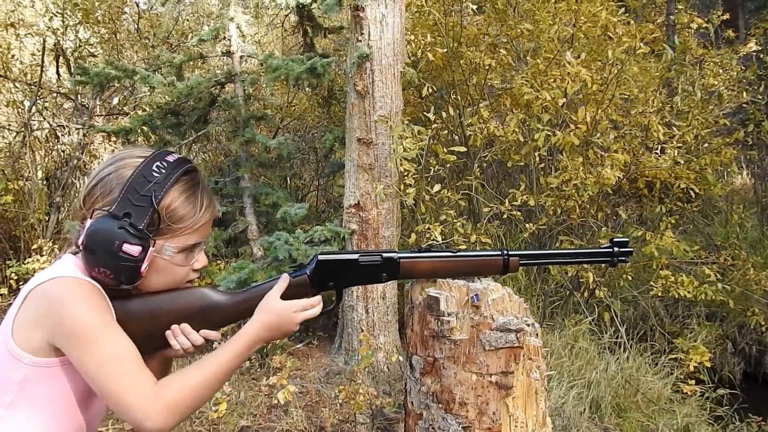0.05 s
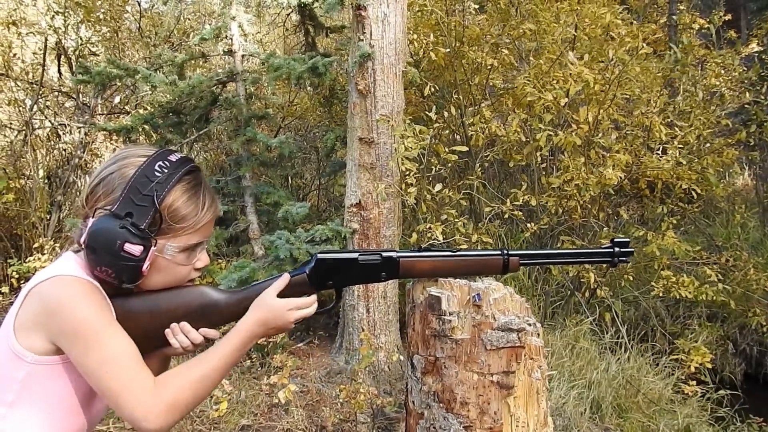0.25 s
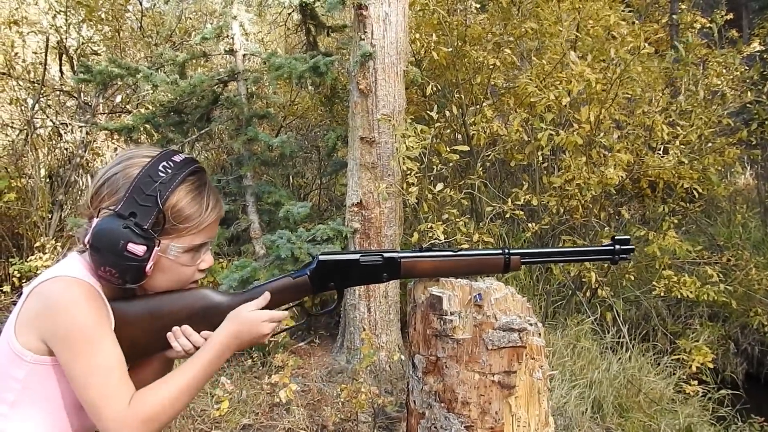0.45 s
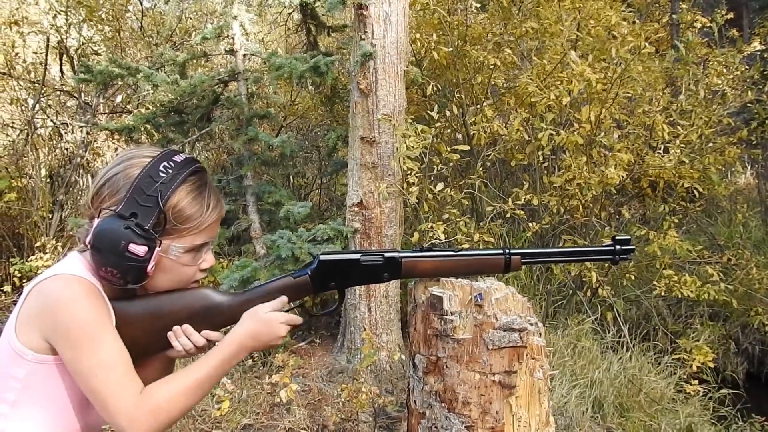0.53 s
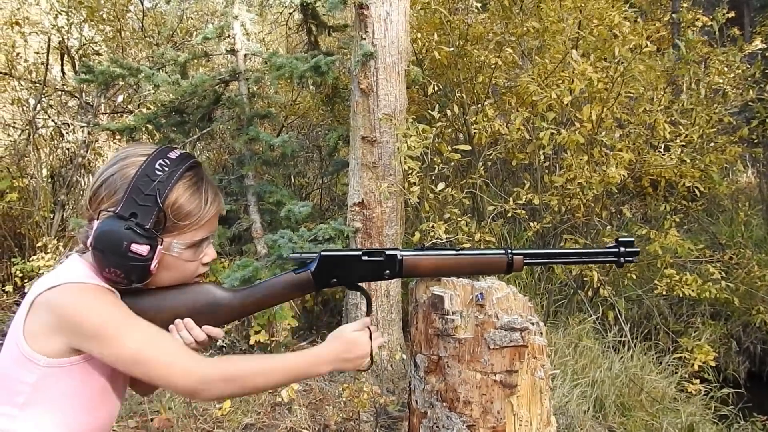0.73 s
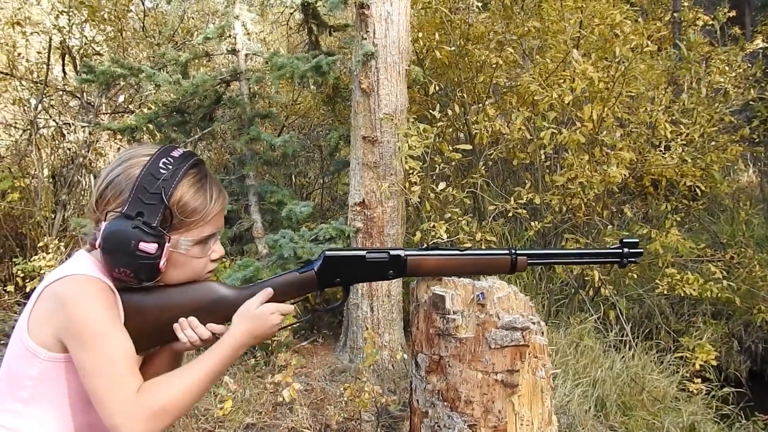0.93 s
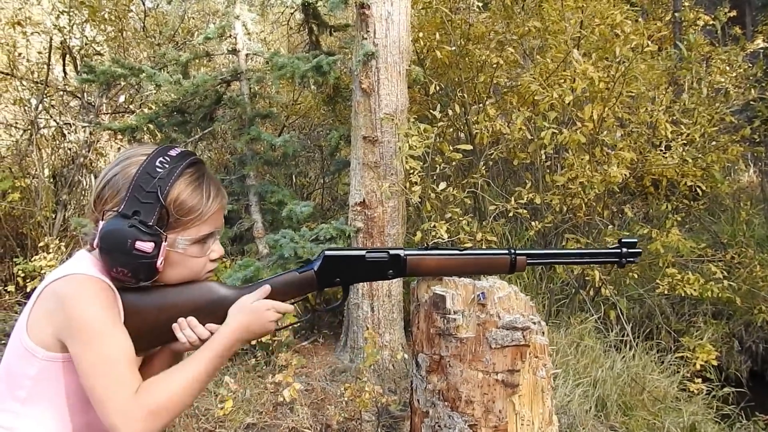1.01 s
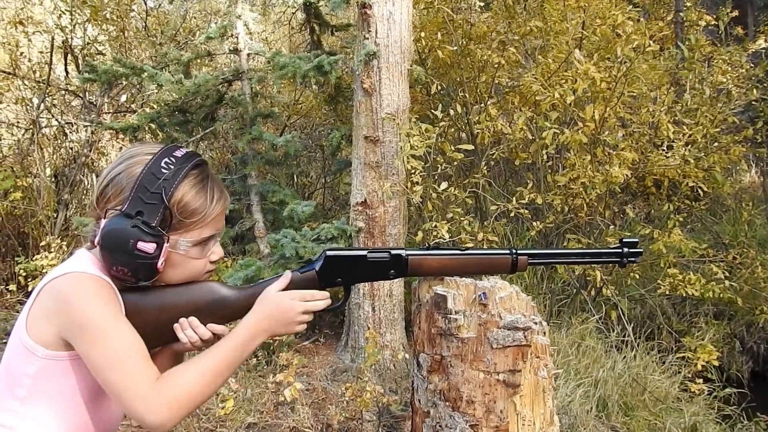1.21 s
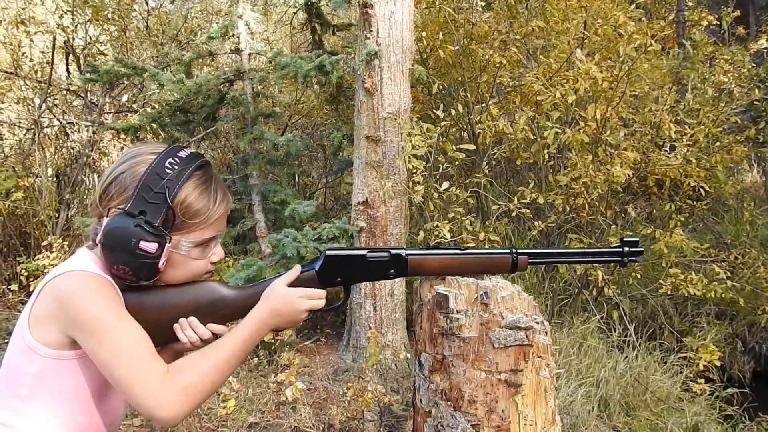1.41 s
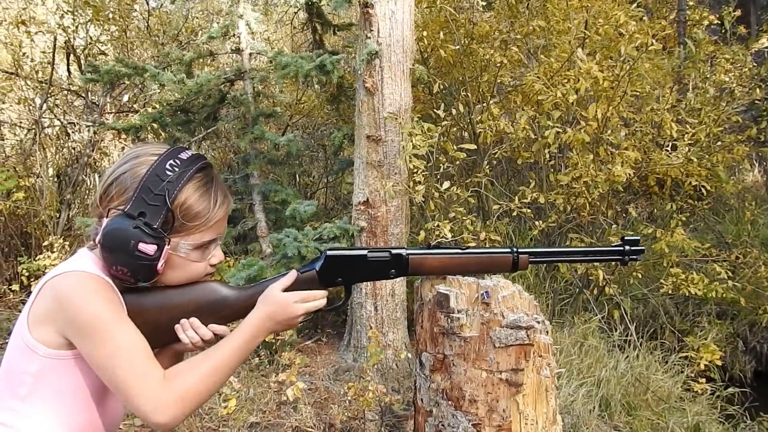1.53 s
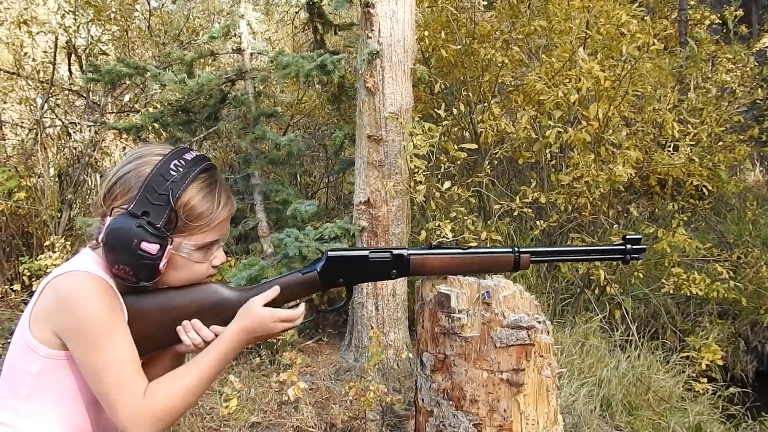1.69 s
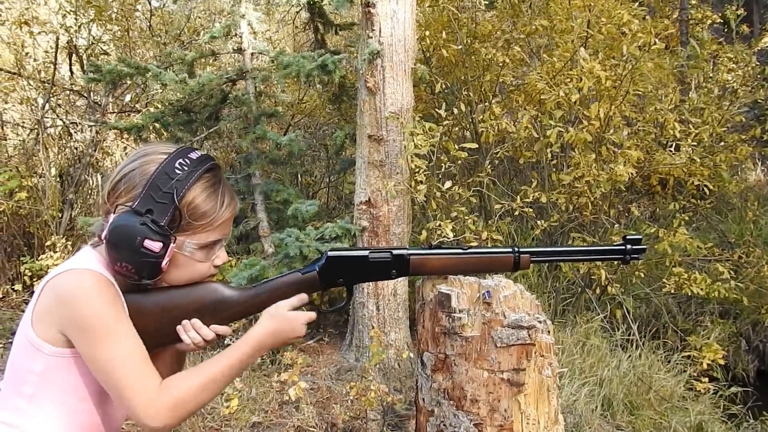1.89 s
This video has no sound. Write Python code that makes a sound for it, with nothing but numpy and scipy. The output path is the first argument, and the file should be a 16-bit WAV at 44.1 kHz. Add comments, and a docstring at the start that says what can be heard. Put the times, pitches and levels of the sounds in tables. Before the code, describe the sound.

Two sharp rifle shots echo outdoors, with metallic lever clacks between them.

```python
"""A small lever-action rifle at the edge of a wood, close to a stereo microphone.
Faint outdoor air and soft low bumps come first and lie beneath. At 0.2 s the first shot: a snap, then
the muzzle blast, thrown back by trunks and foliage. From 0.7 to 1 s the lever is racked open and shut,
steel knocking on steel. Near 1.5 s comes the second shot, and the wood answers again.
Throughout, the recorder lets the treble lag the bass; it clips the blasts."""
import sys
import numpy as np
from scipy import signal
from scipy.fft import rfft, irfft, next_fast_len
from scipy.io import wavfile
from scipy.ndimage import uniform_filter1d

SR = 44100
rng = np.random.default_rng(int(sys.argv[2]) if len(sys.argv) > 2 else 0)


def store_pcm(level_fs):
    """Save levels as 16-bit WAV."""
    pcm = np.round(np.clip(level_fs, -1, 1) * 32767).astype(np.int16)
    wavfile.write(sys.argv[1], SR, np.atleast_2d(pcm).T)


N = 85995


def undb(db):
    return 10 ** (np.asarray(db) / 20)


def curve(points, hz):
    """Read (Hz, value) points on a log-frequency axis."""
    p = np.array(points, float)
    return np.interp(np.log(np.maximum(hz, 1)), np.log(p[:, 0]), p[:, 1])


def fade(t60, size=8192):
    """Exponential decay, 60 dB in t60 seconds."""
    return np.exp(-np.log(1000) * np.arange(size) / SR / max(t60, 1e-4))


def rise(attack_s, size=8192):
    """Soft attack."""
    return 1 - np.exp(-np.arange(size) / SR / attack_s)


def at_level(x, db):
    """Scale a transient to the energy of one millisecond at this level."""
    return x * undb(db) * np.sqrt(SR / 1000 / np.mean(np.sum(x ** 2, axis=-1)))


def colour(x, points, tilt=0, size=4096):
    """Minimum-phase filter with the given spectrum, tilted in dB per octave from 500 to 8000 Hz."""
    hz = np.arange(size // 2 + 1) * SR / size
    gain_db = curve(points, hz) + tilt * np.log2(np.clip(hz, 500, 8000) / 2000)
    cepstrum = irfft(np.log(undb(gain_db)))
    cepstrum[1:size // 2] *= 2
    cepstrum[size // 2 + 1:] = 0
    response = irfft(np.exp(rfft(cepstrum)))
    return signal.fftconvolve(np.atleast_2d(x), response[None], axes=1)[:, :np.shape(x)[-1]]


def bands(x, count=18):
    """Overlapping bands that sum to x, as (centre [Hz], signal)."""
    centres = np.geomspace(40, 16000, count)
    hz = np.arange(N // 2 + 1) * SR / N
    spectrum = rfft(x)
    return [(centre, irfft(spectrum * curve(list(zip(centres, weights)), hz), N))
            for centre, weights in zip(centres, np.eye(count))]


def drift(rate_hz):
    """Slow random wander with a spread near 1."""
    hold = int(SR / rate_hz)
    return uniform_filter1d(np.repeat(rng.standard_normal(N // hold + 1), hold), hold)[:N]


def add(out, s, x):
    """Mix x in at time s."""
    i = int(round(s * SR))
    out[:, i:i + x.shape[1]] += x[:, :N - i]


# Width of sounds far from and near the microphone (frequency [Hz], side minus mid [dB])
FAR_WIDTH = [(60, -6), (200, -11.5), (400, -11.5), (1300, -12), (2400, -14), (4400, -4), (8000, 0),
             (15000, 1)]
NEAR_WIDTH = [(100, -3), (1300, -29), (2400, -17), (4400, -10), (15000, -10)]

def spread(pair, width):
    """Left and right from a mid and a side signal."""
    side = colour(pair[1], width)[0]
    return np.array([pair[0] + side, pair[0] - side])


def from_right(x, lag_s=0.00004):
    """Far sounds reach the microphone's right port first."""
    hz = np.arange(N // 2 + 1) * SR / N
    late_left = irfft(rfft(x[0]) * np.exp(-2j * np.pi * hz * lag_s), N)
    return np.array([late_left, x[1]])


def burst(t60, width, size=8192):
    """Decaying stereo noise."""
    return spread(rng.standard_normal((2, size)) * fade(t60, size), width)


def contact(t60, rough, width, size=8192):
    """One sharp pulse followed by a quick chatter of smaller ones."""
    noise = rng.standard_normal((2, size))
    pair = rough * noise * np.abs(noise) / np.sqrt(3) * fade(t60, size)
    pair[0, 0] += 2
    return spread(pair, width)


def ring(hz, t60, size=8192):
    """A damped sine."""
    return (np.sin(2 * np.pi * hz * np.arange(size) / SR) * fade(t60, size))[None]


# Open air at the edge of the wood (frequency [Hz], level [dB])
AIR_SPECTRUM = [(15, -39), (25, -22), (55, -3.5), (96, -3), (175, -6), (292, -12.5), (488, -8.5),
                (622, -10.5), (772, -12.5), (1010, -12.5), (1220, -14), (1320, -15.5), (2040, -14.5),
                (2750, -20), (3900, -23), (6170, -31), (15900, -64.5)]

def air(level_db=-39, rumble_below_hz=200, rumble_waver_db=0.6, hush_waver_db=1.6):
    """Distant hush over a low rumble, each band wavering on its own."""
    noise = spread(rng.standard_normal((2, N)), FAR_WIDTH)
    out = np.zeros((2, N))
    for hz, band in bands(from_right(colour(noise, AIR_SPECTRUM))):
        waver_db = rumble_waver_db if hz < rumble_below_hz else hush_waver_db
        out += band * undb(drift(rate_hz=13.44) * waver_db)
    return out * undb(level_db) / out.mean(0).std()


# Bumps right at the microphone (time [s], level [dB], pitch [Hz], t60 [s])
MIC_BUMPS = [(.036, -20, 102, 0.062), (.089, -12, 102.6, 0.074), (.238, -17, 155, .06),
             (0.292, -21, 89, 0.11), (.322, -13.5, 91, 0.1), (.404, -12, 99.4, 0.082),
             (.435, -20.5, 86, .12), (.478, -22.5, 89, 0.085), (1.504, -15.5, 183, 0.046),
             (1.562, -40, 69.5, 0.14), (1.679, -22.5, 139, 0.057), (1.871, -18.5, 105, 0.096)]

def bumps(side_db=-9.5):
    """Dull low thumps, a little different in each port."""
    out = np.zeros((2, N))
    for s, db, hz, t60 in MIC_BUMPS:
        side = undb(side_db) * ring(hz * rng.uniform(.6, 1.18), t60)
        thump = ring(hz, t60) + side * np.array([[1], [-1]])
        add(out, s, at_level(thump * rise(attack_s=0.0017), db))
    return out


# What the wood sends back to the microphone (frequency [Hz], level [dB])
WOOD_SPECTRUM = [(30, -14), (150, -10), (350, -15), (700, -8), (1100, -3.5), (1700, -0.5), (3000, -1),
                 (4500, -0.5), (6300, -6), (8000, -17), (11000, -36.5), (16000, -56)]
# Its scatter starts loud at the blast, dips and swells again (time [s], level [dB])
SCATTER_SWELLS = [(0, 4), (.02, -5), (.034, 3), (.052, -1.5), (.066, -2), (.076, 0.5), (.09, -0.5),
                  (.102, -1)]
# Its scatter dying away among the trees (frequency [Hz], t60 [s])
SCATTER_DECAY = [(100, 0.7), (500, 0.9), (1500, 0.65), (3000, 0.64), (6000, 0.38), (8000, 0.28),
                 (16000, 0.15)]

def wood_scatter(tilt, grain_db=1.5):
    """Countless echoes off far trunks and leaves start loud, dip, swell and die away, treble first."""
    t = np.arange(N) / SR
    swells = np.array(SCATTER_SWELLS)
    grains = rng.standard_normal((2, N)) * undb(grain_db * np.minimum(rng.exponential(size=(2, N)), 5))
    scatter = colour(spread(grains, FAR_WIDTH), WOOD_SPECTRUM, tilt)
    dying_s = np.maximum(t - swells[-1, 0], 0)
    tail = sum(band * np.exp(-np.log(1000) * dying_s / curve(SCATTER_DECAY, hz))
               for hz, band in bands(scatter / scatter.std()))
    return from_right(tail * undb(np.interp(t, *swells.T)))


def reflection():
    """A pulse roughened as it comes off a trunk or stump."""
    return contact(t60=0.0018, rough=0.39, width=FAR_WIDTH)


# Trunks to either side (time [s], level [dB], tilt [dB/octave], left minus right [dB])
TRUNK_ECHOES = [(.2435, -12, -3.5, 1), (.2580, -6, 1.5, 1), (0.2609, -11.5, -4, -4), (0.2724, -18, 14, 6),
                (0.2842, -5, -2.5, -13), (.3022, -9, -2.5, -4), (1.504, -10, -3, -3), (1.5094, -24, -3, 6),
                (1.5196, -14, 2, -6), (1.5289, -14.5, -5.5, 0), (1.5308, -16, 4, -6),
                (1.5498, -8.5, -3, -8), (1.5603, -25, 0, -6), (1.5684, -8.5, -3, -3),
                (1.5778, -14, -6.5, 1)]

def trunks():
    """Single trunks throw the blasts back, each from its own direction."""
    out = np.zeros((2, N))
    for s, db, tilt, pan_db in TRUNK_ECHOES:
        echo = colour(reflection(), WOOD_SPECTRUM, tilt)
        add(out, s, at_level(echo * undb([[pan_db / 2], [-pan_db / 2]]), db))
    return out


# What the ground around the rifle reflects (frequency [Hz], level [dB])
GROUND_SPECTRUM = [(100, 7), (1000, -7.5), (3000, -1.5), (4500, -6.5), (7000, -7), (16000, -11.5)]

def ground_scatter(direct, level_db=-16):
    """The ground scatters a little of a close sound back to the microphone."""
    response = colour(burst(t60=0.18, width=FAR_WIDTH), GROUND_SPECTRUM)
    response *= undb(level_db) / np.sqrt(np.sum(response ** 2) / 2)
    return signal.fftconvolve(direct.mean(0)[None], response, axes=1)[:, :N]


# Modes of the rifle's action (frequency [Hz], level [dB], t60 [s])
ACTION_MODES = [(586, -12, 0.026), (1050, -7, 0.052), (1550, -12, .04), (1654, -0.5, 0.046),
                (2080, -3.5, .026), (2720, 1.5, 0.013), (3074, 1.5, 0.017), (3494, -1.5, 0.026),
                (3940, -1.5, .025), (4430, 2.5, 0.015), (4840, 3, 0.0083), (5460, 6.5, 0.0053),
                (6160, 5.5, 0.0069), (8830, -2.5, 0.0071)]
# The bare tick of steel on steel (frequency [Hz], level [dB])
TICK_SPECTRUM = [(100, -3), (700, -15.5), (1500, 9.5), (3000, -6.5), (6500, 0.5), (8500, -7),
                 (12000, -10.5), (16000, -49)]
# How well the rifle radiates (frequency [Hz], level [dB])
RIFLE_RADIATION = [(100, -16), (350, -12.5), (600, -5.5), (1200, -4.5), (1500, 1), (3000, 5.5), (6500, 0),
                   (9000, -5), (16000, -18.5)]
# Lever, bolt and hammer, close up
# (time [s], level [dB], chatter t60 [s], tilt [dB/octave], ring of the struck part [Hz])
LEVER_CLACKS = [(0.6912, -15, 0.06, 2.5, 1590), (0.6948, -12, 0.088, 2.5, 3990),
                (0.7009, -8.5, 0.013, -1.5, 1730), (0.7137, -10, 0.021, 0, 1710),
                (0.7321, -19.5, 0.015, -1.5, 4750), (0.7623, -14, 0.02, 9.5, 3370),
                (0.7675, -15.5, 0.045, 0, 5060), (0.783, -8, 0.0097, 1, 2850),
                (0.8102, -15.5, .014, -4.5, 1430), (0.8947, -13, 0.011, 0, 1580),
                (0.8979, -14, 0.024, 1.5, 3030), (0.9153, -14, 0.061, 0, 1530),
                (0.9364, -11.5, 0.05, -2, 2020), (0.9449, -5.5, .013, 1, 4890),
                (0.9476, -13, .02, -2, 1660), (0.955, -15, 0.023, 0, 1600), (.9703, -11, 0.01, 1, 2570),
                (0.975, -24, 0.022, -2.5, 2030), (0.9799, -9, 0.0054, -5, 2110), (0.982, 0, .01, 1.5, 4280),
                (.9925, -28, 0.019, 9, 1970), (0.9987, -20, .035, 4, 3130)]

def lever():
    """Steel parts knock and chatter, each ringing itself and the whole action."""
    out = np.zeros((2, N))
    for s, db, chatter_t60, tilt, part_hz in LEVER_CLACKS:
        push = contact(chatter_t60, rough=.8, width=NEAR_WIDTH) * rise(attack_s=0.00039)
        body = 0
        for hz, mode_db, t60 in ACTION_MODES:  # each knock rings them a little differently
            gain = undb(mode_db + 2 * rng.standard_normal())
            body += gain * ring(hz * (1 + 0.013 * rng.standard_normal()), t60)
        action, part = (signal.fftconvolve(push, modes, axes=1)[:, :push.shape[1]]
                        for modes in (body, ring(part_hz, t60=0.019)))
        tick = colour(push, TICK_SPECTRUM)
        clack = at_level(action, db=0) + at_level(part, db=-6) + at_level(tick, db=-2)
        add(out, s, at_level(colour(clack, RIFLE_RADIATION, tilt), db))
    return out + ground_scatter(out)


# The snap and the fizz that open a shot (frequency [Hz], level [dB])
SNAP_SPECTRUM = [(30, 9), (300, 6), (1200, -11), (2500, -16), (4000, 11), (6500, 13), (10000, -32),
                 (16000, -36)]
FIZZ_SPECTRUM = [(30, -19), (300, -8), (1200, 7.5), (2500, -13), (4000, 6.5), (4500, -24), (16000, -47)]
SNAP_LEAD_S = 0.0102  # ahead of the blast

def snap(snap_db, fizz_db):
    """A sharp pulse trails a wide fizz, while a closer fizz swells up to the blast."""
    out = np.zeros((2, N))
    pulse = colour(signal.unit_impulse(4096), SNAP_SPECTRUM)
    fizz = colour(burst(t60=0.063, width=FAR_WIDTH), FIZZ_SPECTRUM)
    falling = burst(t60=0.031, width=NEAR_WIDTH)[:, :int(SNAP_LEAD_S * SR)]
    swell = colour(falling[:, ::-1], FIZZ_SPECTRUM)
    add(out, 0, at_level(pulse, snap_db))
    add(out, 0, at_level(fizz, fizz_db))
    add(out, 0, at_level(swell, db=-5.5))
    return out


# Pressure pulse and rush of gas, close to the muzzle (frequency [Hz], level [dB])
BLAST_SPECTRUM = [(30, -26), (150, -12.5), (280, -8), (450, -1), (1200, -1), (2200, 2), (4000, 3),
                  (6200, 2.5), (9000, -9), (12000, -30), (16000, -36)]
GAS_SPECTRUM = [(30, -14), (170, -4), (300, -5), (500, 8), (1300, -6), (2300, -20), (4000, -33), (6500, -6),
                (10000, -23), (16000, -45)]

def muzzle_blast(blast_db, ring_hz, ring_db, thud_hz, thud_db, bounce_s=0.0033):
    """A pulse with a ring, a thud and a rush of gas; it bounces off the stump under the barrel."""
    out = np.zeros((2, N))
    pulse = -colour(signal.unit_impulse(4096), BLAST_SPECTRUM)
    bounce = colour(reflection(), BLAST_SPECTRUM)
    gas = colour(burst(t60=0.023, width=FAR_WIDTH), GAS_SPECTRUM)
    thud = -np.diff(ring(thud_hz, t60=0.022))
    add(out, 0, at_level(pulse, blast_db))
    add(out, 0, at_level(-ring(ring_hz, t60=0.0089), ring_db))
    add(out, 0, at_level(thud, thud_db))
    add(out, 0, at_level(gas, db=-6.5))
    add(out, bounce_s, at_level(bounce, db=-4.5))
    return out


# Two shots close to the microphone (blast time [s], blast [dB], snap [dB], fizz [dB], ring [Hz],
# ring [dB], thud [Hz], thud [dB], wood [dB], wood tilt [dB/octave])
RIFLE_SHOTS = [(0.2086, -9.5, -18, -6.5, 1530, -1.5, 557, -9, -17.5, -0.4),
               (1.4745, -6.5, -17, -20.5, 2950, -4, 320, -15, -15.5, -0.53)]

def shots():
    """The rifle snaps, the muzzle blasts and the wood answers."""
    out = np.zeros((2, N))
    for s, blast_db, snap_db, fizz_db, ring_hz, ring_db, thud_hz, thud_db, wood_db, tilt in RIFLE_SHOTS:
        add(out, s - SNAP_LEAD_S, snap(snap_db, fizz_db))
        add(out, s, muzzle_blast(blast_db, ring_hz, ring_db, thud_hz, thud_db))
        add(out, s, undb(wood_db) * wood_scatter(tilt))
    return out


def scene():
    return shots() + trunks() + lever() + bumps() + air()


def record(dry, split_hz=4150, treble_lag_s=0.0103, top_hz=15900):
    """The treble arrives a little after the bass; peaks clip, the level dips once, the top is cut."""
    size = next_fast_len(2 * N)
    hz = np.arange(size // 2 + 1) * SR / size
    treble = .5 + .5 * np.tanh((hz - split_hz) / 120)
    lag = np.sqrt(1 - treble) + np.sqrt(treble) * np.exp(-2j * np.pi * hz * treble_lag_s)
    lagged = irfft(rfft(dry, size) * lag, size)[:, :N]
    clipped = np.clip(lagged, -1, 1)
    dip_s, dip_db, recovery_s = 1.5315, -13, 0.011  # just after the second blast
    since = np.arange(N) / SR - dip_s
    dip = undb(dip_db * (since > 0) * np.exp(-(since / recovery_s) ** 2))
    lowpass = signal.ellip(8, .2, 70, top_hz, fs=SR, output="sos")
    return signal.sosfilt(lowpass, clipped * dip)


dry = scene()
out = record(dry)
store_pcm(out)
```